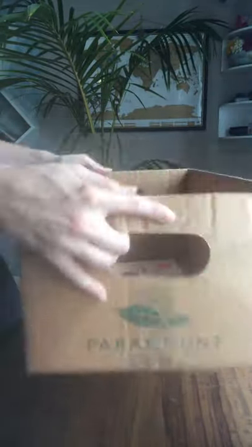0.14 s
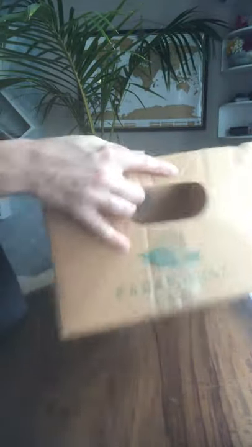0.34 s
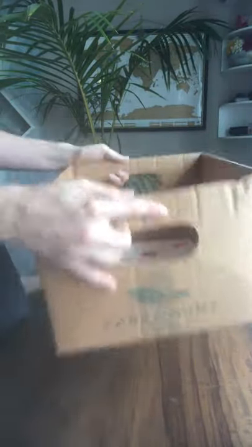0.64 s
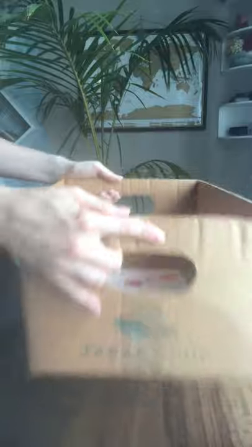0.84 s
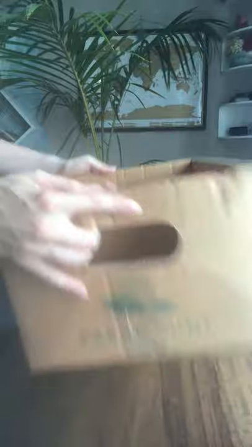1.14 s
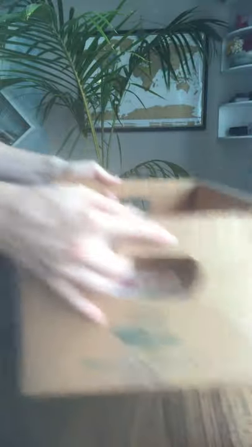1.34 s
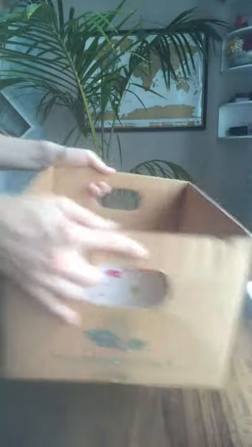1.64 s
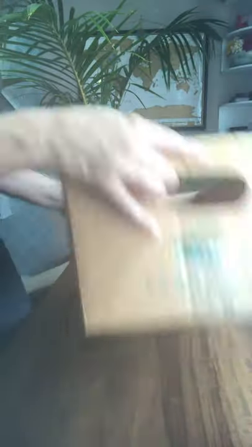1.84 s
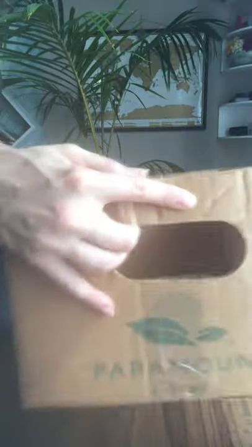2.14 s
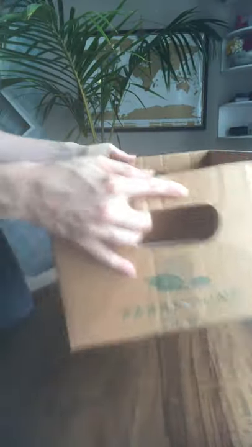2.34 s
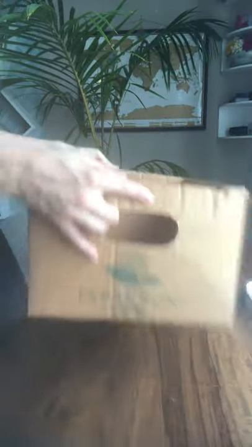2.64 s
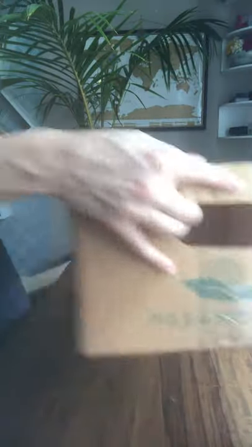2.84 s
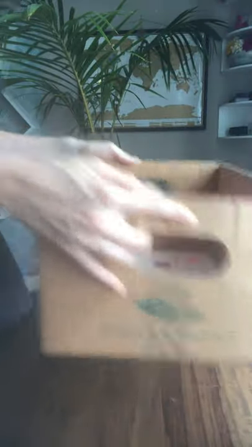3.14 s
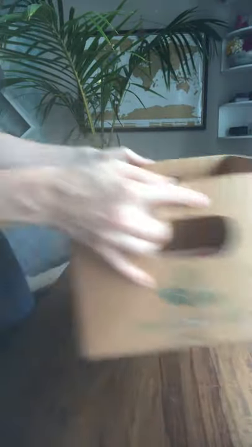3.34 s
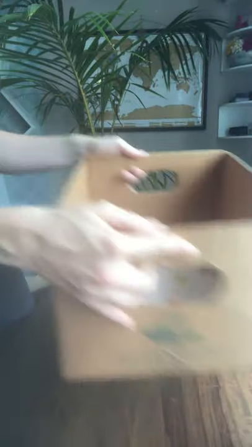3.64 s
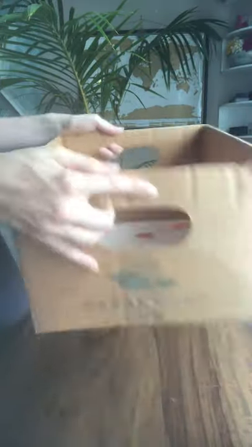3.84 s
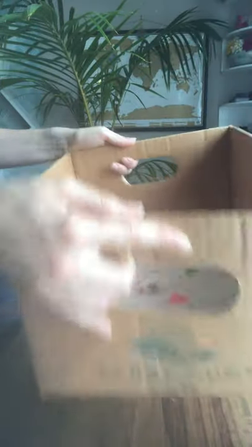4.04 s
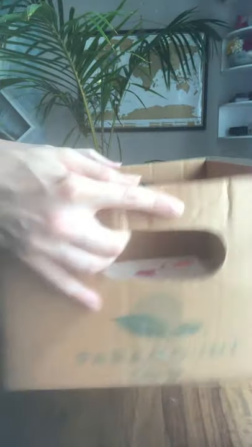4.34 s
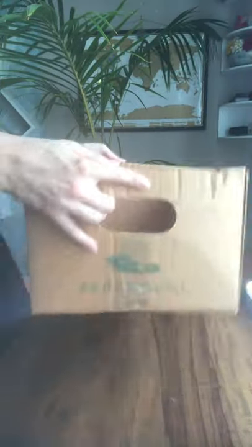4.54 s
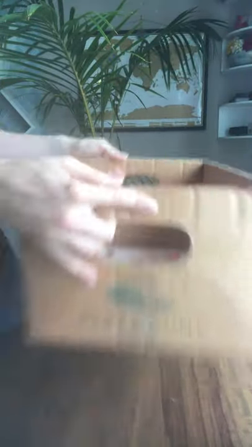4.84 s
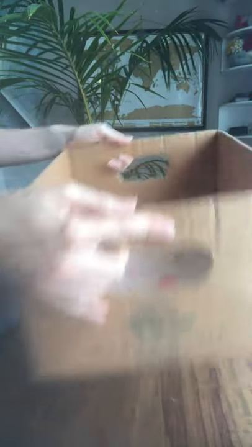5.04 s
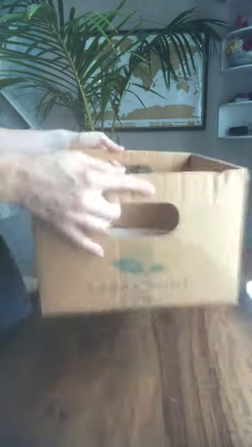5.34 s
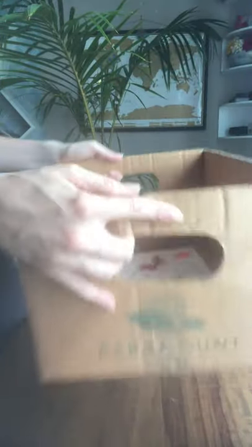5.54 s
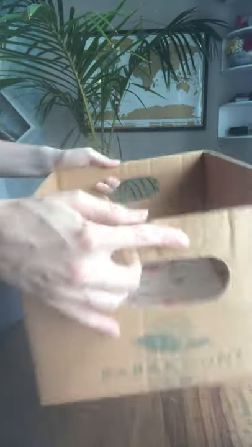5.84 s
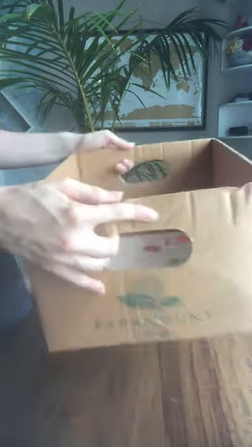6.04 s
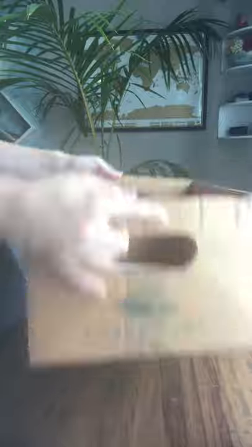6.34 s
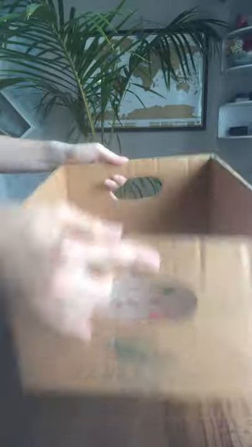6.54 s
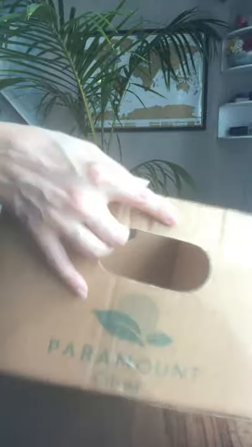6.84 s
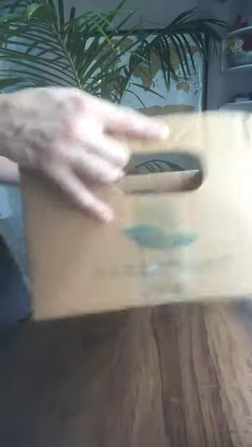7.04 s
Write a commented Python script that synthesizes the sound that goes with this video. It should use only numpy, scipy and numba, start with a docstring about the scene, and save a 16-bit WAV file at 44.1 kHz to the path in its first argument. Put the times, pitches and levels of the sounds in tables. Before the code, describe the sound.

Marbles clatter continuously inside a hand-shaken cardboard box, heard close up indoors. Woody, papery thumps and drier clacks vary in strength, from faint taps to sharp loud knocks, with grainy rolling and hiss between them. A soft hand thud hides in the rattle around five seconds; the strongest knocks follow shortly after, then a bright glass click and weaker rattling to the end. Short room reflections and low background hum.

```python
"""Dull knocks and rattles: glass marbles roll about in an open cardboard box that is tilted and shaken close by.
Each knock rings the panels of the box as damped sines and cracks as short noise; light rebounds follow.
Between knocks the marbles rumble and swish over the corrugated floor, as many tiny blows and flickering noise.
A glass click, stray ticks and a hand's soft thud join in. A living room adds a short noise tail, low hum and hiss."""
import sys
import numpy as np
from scipy import signal
from scipy.fft import rfft, irfft, next_fast_len
from scipy.io import wavfile
from scipy.ndimage import uniform_filter1d
from numba import njit

SR = 44100
rng = np.random.default_rng(int(sys.argv[2]) if len(sys.argv) > 2 else 0)


def output_pcm(signal):
    """Save a mono or channel-first signal as 16-bit PCM at the path in sys.argv[1].

    Samples are clipped to [-1, 1] before scaling.
    """
    pcm = np.clip(np.atleast_2d(signal).T, -1, 1) * 32767
    wavfile.write(sys.argv[1], SR, np.round(pcm).astype(np.int16))


N = 316669
ROUGH_DB = 3.5  # spread of the random roughness of level; a burst gets half of it

# Knocks on the walls, with a glass click of marble on marble at 6.17 s:
# start_s [s], strength_db [dB]; then levels over the strength: boom_db (large panels),
# knock_db (side walls), crack_db, tick_db [dB]; then the pitches favoured in the large panels, side walls
# and small patches: boom_hz, knock_hz, clack_hz [Hz]
HITS = [(0.0392, -15.5, -3, -5, -17, -29, 397, 810, 1485),
        (0.1248, -12, -10, -6.5, -14.5, -29, 438, 520, 1560),
        (0.2074, -27, -5, -5, -14, -20, 254, 945, 1570), (0.2362, -28, -6, -1.5, -12, -14, 440, 577, 1150),
        (0.2746, -33.5, 6.5, 7.5, -6.5, -17, 255.4, 504, 1050),
        (0.2945, -36.5, -8, -1, -2, -4, 425, 527, 2020), (0.354, -32.5, 0, 2, -18, -14, 232, 637, 1120),
        (0.378, -12.5, -14, -10.5, -12.5, -31, 245, 860, 1620),
        (0.4186, -31, -7, 0, -2, -8, 410, 746, 2240), (0.4573, -8, -7, -10.5, -27, -29, 320, 726, 1133),
        (0.526, -10, -23, -10, -23.5, -39, 248, 1027, 1186),
        (0.5667, -14.5, -12, -12, -13, -26, 268, 1080, 1550),
        (0.5921, -20, -13, -12, -21, -23, 278, 510, 1320),
        (0.635, -7.5, -8.5, -2.5, -17, -18.5, 262, 980, 1030),
        (0.7281, -13.5, -12, -8, -8, -15.5, 253, 778, 2380),
        (0.7959, -3, -10.5, -2.5, -33, -29, 320, 706, 1590),
        (0.8672, -14, -7, -7.5, -11.5, -21, 240, 1070, 1140),
        (0.8851, -7.5, -19.5, -9.5, -14.5, -33, 269, 920, 1060),
        (0.9615, -8.5, -9.5, -12.5, -17, -14.5, 252.5, 573, 2340),
        (1.0334, -15.5, -14.5, -9.5, -6.5, -14, 254, 746, 2520),
        (1.1601, -21, -11, -5.5, -18, -26, 260, 950, 1110), (1.2, -31.5, -10, -6, -4, -8, 244, 1010, 2120),
        (1.3537, -27.5, -6, -4, -12, -17, 232, 720, 1160), (1.3747, -20, 1, 9.5, -19, -22, 249, 712, 1150),
        (1.3846, -16, -10, -3, -22, -30, 350, 730, 2200),
        (1.4139, -24.5, -6, -11, -31, -28, 248, 557, 1160), (1.4591, -38, 1, -2, -17, -17, 374, 573, 1390),
        (1.492, -30, -2, -17, -18, -22, 382, 505, 1300), (1.6441, -25.5, -8, -5, -13, -27, 425, 580, 1130),
        (1.6977, -25.5, -15, -14, -19, -21, 270, 930, 1130),
        (1.729, -17.5, -4.5, -11, -22, -24, 283, 970, 1510),
        (1.7377, -19, 3.5, -2.5, -20.5, -24, 273, 838, 1110),
        (1.91, -18.5, 2.5, -7.5, -13.5, -14.5, 362, 966, 1930),
        (2.0151, -27.5, -17, -18, -11, -17, 394, 550, 1320),
        (2.0401, -16.5, -21, -8.5, -10, -26, 228, 530, 2000),
        (2.0542, -7.5, -7.5, -5, -22, -28, 385, 840, 1270), (2.1035, -18, -7, -3, -16, -15, 258, 485, 1230),
        (2.159, -4, -15.5, -6, -17.5, -21.5, 340, 720, 1640),
        (2.2383, -11, -13, -6, -17, -23, 269, 902, 1330),
        (2.3104, -23, 2, -0.5, -11.5, -16, 412, 514, 1170),
        (2.3582, -14, -2, 1, -15.5, -18.5, 390, 811, 1190),
        (2.4234, -17, -14, -5.5, -15.5, -30, 274, 700, 1146),
        (2.5157, -32, -9, -18, -13, -16, 242, 514, 1480),
        (2.5894, -14.5, -21, -11, -16, -25, 270, 1050, 1510),
        (2.5985, -18, -0.5, -9.5, -33, -23, 253, 531, 1150),
        (2.6438, -30.5, -12, -9, -4.5, -10, 393, 522, 1070),
        (2.7686, -13, -8.5, -13, -20, -35, 377, 900, 1470),
        (2.7872, -6.5, -10.5, -4.5, -19, -39, 270, 790, 1190),
        (2.8954, -11.5, -22.5, -2.5, -25, -33, 416, 630, 1100),
        (2.9796, -35.5, -8, -8, 0, -7, 392, 826, 1140),
        (3.0722, -12.5, -2.5, -13, -16, -11, 320, 800, 1150),
        (3.0811, -10.5, -12.5, -12, -18, -24, 410, 940, 1640),
        (3.2082, -20, 5.5, 0, -18, -23, 361, 819, 1130),
        (3.3428, -18.5, -15, -22, -12.5, -32, 277, 1000, 1750),
        (3.3573, -7, -20.5, -13.5, -14.5, -36, 270, 1120, 1600),
        (3.4484, -15, -2.5, -1.5, -18, -38, 248, 550, 1110),
        (3.5408, -39.5, -5, -6, -7, -16, 380, 689, 1350), (3.6403, -16, -15, -17, -12, -27, 265, 665, 1740),
        (3.647, -5, -16, -12, -18, -34, 277, 1110, 1570),
        (3.7559, -17.5, -11, -12, -21, -27, 382, 480, 1130),
        (3.8548, -13, -5, -2.5, -10, -28, 252.7, 855, 1620), (3.8816, -23, -5, 4, -26, -28, 261, 854, 1630),
        (3.9381, -25.5, -14, -11, -15, -19, 393, 1110, 1150),
        (3.9601, -21, -17, -16, -31, -36, 218, 744, 1110),
        (4.0003, -31.5, -18, -9, -11, -17, 248, 659, 1380),
        (4.0433, -33, -10, -11, -7, -12, 261, 490, 1130), (4.0766, -44, -17, -25, 1, -4, 398, 626, 1090),
        (4.137, -8.5, -18.5, -19, -18, -31, 275, 1020, 1390),
        (4.1466, -13, -5, -2, -18, -32, 271, 740, 1760), (4.1804, -32, -6, 2, -4, -11, 282, 535, 1680),
        (4.2445, -7.5, -15, -5, -15.5, -26, 416, 774, 1200),
        (4.3024, -22.5, -1, -4, -25, -17, 350, 814, 1130),
        (4.3142, -10, -10.5, -9, -13.5, -21.5, 271, 738, 1940),
        (4.471, -15.5, -24, -20, -30, -26, 307, 770, 1340),
        (4.4889, -12, -14.5, -16, -17, -37, 276, 1140, 1110),
        (4.5172, -33, -8, -8, 0.5, -13, 425, 530, 1620), (4.5929, -28.5, 7, -2.5, -19, -26, 269, 776, 1530),
        (4.6304, -26, -6, -8, -28, -31, 258, 840, 1480),
        (4.6506, -8.5, -15, -10.5, -16, -43, 258, 805, 1140),
        (4.691, -29, -12, -19, -4, -16, 448, 940, 1120),
        (4.8317, -10, -22, -24, -14.5, -27, 300, 1070, 2260),
        (4.8436, -19, -9, -6, -35, -38, 217, 892, 1910), (4.9089, -35, -4, -14, 1, -5, 256, 525, 2410),
        (5.0343, -15.5, -13, -9, -8.5, -23, 244, 710, 1550),
        (5.0856, -16.5, -4.5, 7, -15.5, -24, 237, 730, 1050),
        (5.1644, -27.5, 6, -1.5, -12, -17, 252, 508, 1580),
        (5.2108, -1.5, -15.5, -16, -16.5, -20.5, 225, 930, 1501),
        (5.2754, -8, -1.5, -5.5, -10.5, -14, 270, 821, 1160),
        (5.3606, -19.5, -3.5, -12, -18, -22, 253, 555, 1050),
        (5.4125, -21.5, -13, -19, -20, -25, 388, 690, 1505),
        (5.4424, -27, -1, -1, -21, -25, 290, 710, 1120), (5.4527, -5, -8.5, -1, -21.5, -27, 317, 730, 2010),
        (5.6202, -16.5, -17, -13, -22, -26, 221, 999, 1840),
        (5.6322, 0.5, -16, -12.5, -19.5, -26, 271, 554, 1360),
        (5.8012, -8.5, -15, -7, -18.5, -32, 253, 680, 1176),
        (5.8375, -5, -7.5, -0.5, -14.5, -25, 332, 723, 1940),
        (5.9742, -7, -18.5, -16, -21, -21, 268, 810, 1980),
        (6.0257, -7.5, -5, -3.5, -15.5, -25, 377, 816, 2010),
        (6.1694, -31.5, -14, -13, -16, 14, 240, 530, 2640),
        (6.2489, -25, 1.5, 10, -13, -18, 239, 643, 1410),
        (6.287, -37.5, -11, -12, -0.5, -11, 221, 624, 1130),
        (6.3167, -34.5, -9, -15, -9, -10, 242, 550, 1130),
        (6.3485, -24, 2.5, -7, -9.5, -18, 274, 487, 1130), (6.4582, -28, -21, -18, -8, -18, 285, 530, 2540),
        (6.5903, -13.5, -13, -15.5, -9, -26, 262, 930, 1740),
        (6.6653, -27.5, -12.5, -15, -8.5, -13, 405, 547, 2100),
        (6.786, -30, -8, -5, -14, -16, 273, 1080, 1290),
        (6.7937, -18.5, -15, -6.5, -15.5, -19, 370, 717, 1880),
        (6.8504, -30, -11, -17, -12, -21, 412, 743, 2000),
        (6.9348, -32.5, -5, -10.5, -7.5, -8, 428, 482, 1140),
        (6.9776, -32.5, -13, -18, -11, -16, 256, 504, 1140),
        (7.012, -30.5, -17, -14, 1, -7, 404, 1100, 1120), (7.107, -21, -17, -26, -14, -32, 266, 1100, 1904),
        (7.118, -22, -17, -16, -14, -16, 288, 680, 2140)]


def knocks():
    """Knocks on the walls and one glass click; each has three rebounds that hardly move the large panels."""
    span_s, first_loss_db, fade_db, scatter_db = 0.035, -11.5, -30, 29.0
    s, db, boom_db, knock_db, crack_db, tick_db, boom_hz, knock_hz, clack_hz = np.transpose(HITS)
    chance = rng.random((len(s), 3, 3))
    hits = np.array([s, db, db + boom_db, db + knock_db, db + crack_db, db + tick_db,
                     boom_hz, knock_hz, clack_hz])
    # from here on each knock stands three times, once for each rebound
    s, clack_db, boom_db, knock_db, crack_db, tick_db, boom_hz, knock_hz, clack_hz = np.repeat(hits, 3, axis=1)
    late, luck, bend = chance.reshape(-1, 3).T
    # later rebounds are weaker on average
    loss_db = first_loss_db + fade_db * late + scatter_db * (luck - 0.5)
    rebounds = [s + 0.0044 + span_s * late,
                clack_db + loss_db, boom_db + loss_db - 8.0, knock_db + loss_db - 1.0,
                crack_db + loss_db, tick_db + loss_db - 35.0,
                boom_hz, knock_hz, clack_hz * 2 ** (bend - 0.5)]
    return blows(*np.hstack([hits, rebounds]))


def blows(at, clack_db, boom_db, knock_db, crack_db, tick_db, boom_hz, knock_hz, clack_hz):
    """A marble's hit rings small patches, side walls and large panels, and adds noise; large panels answer last."""
    # Ringing modes of the large panels: pitch_hz [Hz], relative level_db [dB], t60_s (time to fade 60 dB) [s]
    boom_modes = [(126, -4, 0.14), (238.7, -7, 0.082), (269.8, -0.5, 0.079), (335, -2.5, 0.036),
                  (397.5, 2, 0.053)]
    # Ringing modes of the side walls: pitch_hz [Hz], relative level_db [dB], t60_s [s]
    knock_modes = [(528.5, -5, 0.12), (629, -3.5, 0.013), (729.6, 1.5, 0.035), (826, -1.5, 0.05),
                   (892, -1.5, 0.045)]
    # Ringing modes of small patches of board: pitch_hz [Hz], relative level_db [dB], t60_s [s]
    clack_modes = [(1136, 0, .035), (1362, -2, .028), (1630, -1, .028), (1776, -2, .025), (2070, -1, .022),
                   (2300, -3, .02), (2487, -3, .02), (2900, -6, .018), (3350, -6, .018)]
    boom = board(at + 0.0011, boom_db + 6.5, boom_hz, boom_modes,
                 focus_db=9.7, place_db=1.2, detune=0.051, spread_s=0.00094)
    knock = board(at + 0.00039, knock_db + 6.0, knock_hz, knock_modes,
                  focus_db=40.7, place_db=0.23, detune=0.049, spread_s=0.00051)
    # random roughness of level makes the clacks less tonal and noisier
    roughness = ragged(ROUGH_DB)
    clack = roughness * board(at, clack_db - 2.0, clack_hz, clack_modes,
                              focus_db=6.3, place_db=5.1, detune=0.045, spread_s=0.0008)
    # the board gives under the marble, so the panels are pushed with a softened click
    soft_hz = 1580
    panels = signal.sosfilt(signal.butter(2, soft_hz, fs=SR, output="sos"), boom + knock)
    ringing = panels + band(clack, 760, 4850)
    crack = burst(at, crack_db, lo_hz=1756, hi_hz=4848, t60=0.0564, level_db=-2.77)
    tick = burst(at, tick_db, lo_hz=2900, hi_hz=11900, t60=0.019, level_db=0.11)
    return ringing + crack + tick


def board(at, db, pitch_hz, modes, focus_db, place_db, detune, spread_s):
    """Blows ring a family of modes; the place of the blow favours those near one pitch, the grip detunes them."""
    hz, mode_db, t60 = np.transpose(modes)
    place = rng.standard_normal((len(at), 4, len(modes)))
    octaves = np.log2(hz / pitch_hz[:, None])
    # modes far from the favoured pitch lose level, by 14 dB at most
    far_db = np.minimum(focus_db * abs(octaves), 14.0)
    share = undb(mode_db - far_db + place_db * place[:, 0])
    share = share / np.sqrt(np.sum(share ** 2, axis=1, keepdims=True))
    # the nearest mode is bent onto the favoured pitch; the others stray at random
    nearest = abs(octaves) == abs(octaves).min(axis=1, keepdims=True)
    tuned = np.where(nearest, pitch_hz[:, None], hz * (1 + detune * place[:, 1]))
    start = ((at[:, None] + spread_s * abs(place[:, 2])) * SR).astype(np.int64)
    gain = undb(db)[:, None] * share * np.sign(place[:, 3])
    return rings(N, start.ravel(), tuned.ravel(), np.tile(t60, len(at)), gain.ravel(), float(SR))


@njit
def rings(length, start, hz, t60, gain, rate):
    """Damped sines, each from its own moment until it has faded by 45 dB."""
    out = np.zeros(length)
    for k in range(len(start)):
        # one step of turning and fading per sample
        step = np.exp(2j * np.pi * hz[k] / rate - np.log(1000) / (t60[k] * rate))
        swing = gain[k] + 0j
        for i in range(start[k], min(length, start[k] + int(0.75 * t60[k] * rate))):
            out[i] += swing.imag
            swing *= step
    return out


def burst(at, db, lo_hz, hi_hz, t60, level_db):
    """Blows too dense in modes to have a pitch: a snap and a fast fading, ragged noise."""
    snap_share, snap_db = 0.4, -6  # the snap's part of the fade time; its level over the fade
    push = clicks(at, undb(db + level_db))
    fade = fading(push, t60)
    snap = fading(push, snap_share * t60)
    envelope = (fade + undb(snap_db) * snap) * ragged(ROUGH_DB / 2)
    return envelope * unit(band(rng.standard_normal(N), lo_hz, hi_hz))


def ragged(db):
    """Random roughness of level: a gain that jumps every 50 samples, about a millisecond."""
    return undb(db * np.repeat(rng.standard_normal(N // 50 + 1), 50)[:N])


def rolling():
    """Marbles hop over the flutes of the board in many tiny blows and rub with a flickering hiss."""
    # Colour of the rubbing hiss: pitch_hz [Hz], relative level_db [dB]
    rub_colour = [(1200, 3.5), (2500, -3.5), (4200, -5), (5200, -5), (7500, -5), (10300, -20), (12000, -9),
                  (15500, -13)]
    s, rumble_db, hiss_db = motion()
    chance = rng.random((900, 5))  # 900 hops
    at = chance[:, 0] * N / SR
    # most hops are small and a few are large
    size_db = -2.5 * np.log(1 - chance[:, 1])
    low_db = np.interp(at, s, rumble_db) + size_db - 7.0
    high_db = np.interp(at, s, hiss_db) + size_db
    # each favoured pitch lies up to an octave above these
    pitch_hz = np.array([230, 500, 1050]) * 2 ** chance[:, 2:]
    hops = blows(at, low_db + 3.5, low_db - 11.0, low_db + 1.7, high_db - 2.0, high_db - 31.0, *pitch_hz.T)
    # the hiss wavers by about 3 dB in steps of some 7 ms
    steps = np.repeat(rng.standard_normal(N // 300 + 1), 300)[:N]
    flicker = unit(uniform_filter1d(steps, size=200))
    rub = unit(colour(rng.standard_normal(N), [(20, -60)] + rub_colour))
    rub_db = np.interp(np.arange(N) / SR, s, hiss_db) + 3.0 * flicker + 2.5
    return hops + rub * undb(rub_db)


def motion():
    """Levels of rumble and hiss in dB over time: at rest, in each shake, and rolling off after each knock."""
    # Shakes that sweep the marbles over the floor: peak_s [s], guide hiss level_db before trims [dB]
    shakes = [(.12, -52), (.25, -50), (.41, -48.5), (.57, -48), (.76, -48), (.89, -47.5), (1.05, -47),
              (1.19, -48.5), (1.37, -50.5), (1.58, -60), (1.73, -51.5), (1.93, -57.5), (2.06, -54),
              (2.18, -50), (2.27, -49), (2.44, -47.5), (2.61, -48.5), (2.79, -46.5), (2.89, -53),
              (2.98, -52), (3.09, -48.5), (3.22, -54), (3.36, -53.5), (3.5, -56.5), (3.66, -56.5),
              (3.88, -54), (4.02, -52), (4.16, -47), (4.33, -46), (4.5, -46.5), (4.671, -44), (4.86, -44.5),
              (5.06, -47.5), (5.18, -51.5), (5.27, -54), (5.47, -47.5), (5.64, -45.5), (5.83, -47),
              (6.01, -49), (6.19, -52.5), (6.31, -58), (6.48, -49), (6.61, -49), (6.8, -50.5),
              (6.95, -51.5), (7.13, -51.5)]
    swell_s, settle_s = 0.04, 0.054  # a swish grows and dies as half a bell curve of these widths
    rest_rumble_db, rest_hiss_db = -60.5, -65  # guide levels between shakes
    shake_rumble_db = 7  # a shake's rumble over its hiss
    roll_off_db, roll_off_slope = -25, 0.8  # rolling off: level, and dB per dB of the knock
    rise_s, roll_off_t60_s = 0.09, 0.67
    t = np.arange(0, N / SR, 0.002)
    peak_s, peak_db = np.transpose(shakes)
    since = t[:, None] - peak_s
    width_s = np.where(since < 0, swell_s, settle_s)
    swish = undb(peak_db) * np.exp(-0.5 * (since / width_s) ** 2)
    swish_power = np.sum(swish ** 2, axis=1)
    # a knock sends the marbles rumbling off
    s, db, boom_db, knock_db = np.transpose(HITS)[:4]
    age = np.maximum(t[:, None] - s, 0)
    spurts = undb(roll_off_db + roll_off_slope * (db + np.maximum(boom_db, knock_db)))
    spurts = spurts * (1 - np.exp(-age / rise_s)) * np.exp(-np.log(1000) * age / roll_off_t60_s)
    # powers add up; doubling the dB squares the gain
    rumble_power = undb(2 * rest_rumble_db) + undb(2 * shake_rumble_db) * swish_power
    rumble_power = rumble_power + np.sum(spurts ** 2, axis=1)
    hiss_power = undb(2 * rest_hiss_db) + swish_power
    return t, 10 * np.log10(rumble_power), 10 * np.log10(hiss_power)


def strays():
    """Light ticks of marbles touching each other at random moments, as short noise bursts."""
    chance = rng.random((170, 2))  # 170 ticks
    size_db = -47.5 - 2.0 * np.log(1 - chance[:, 1])
    return burst(chance[:, 0] * N / SR, size_db, lo_hz=1200, hi_hz=6000, t60=0.0235, level_db=-0.5)


def bump():
    """A hand shifts its grip with a soft thud: one low, damped swing that starts softly."""
    start_s, pitch_hz, t60_s, level_db = 5.012, 86.5, 0.042, -18
    t = np.maximum(np.arange(N) / SR - start_s, 0)
    swing = undb(level_db) * np.sin(2 * np.pi * pitch_hz * t)
    return swing * 1000 ** (-t / t60_s) * (1 - np.exp(-t / 0.0011))


def room(x):
    """Dense reflections as fading noise, each octave at its own rate; they change as the box moves."""
    # Fading of the room: pitch_hz [Hz], t60_s (time to fade 60 dB) [s], relative level_db [dB]
    room_fade = [(100, 0.5, -2.5), (296, 0.31, 7.5), (1000, 0.31, 0), (3000, 0.45, -4), (8150, 0.25, -4.5),
                 (15300, 0.24, 6.5)]
    places, place_s = 5, 0.13  # places of the box, visited in turn; time from one to the next
    level_db, rise_s = -13.5, 0.001
    fade_hz, fade_t60_s, fade_db = np.transpose(room_fade)
    t = np.arange(int(0.4 * SR)) / SR
    tails = 0
    for hz in 70 * 2 ** np.arange(8):
        middle = np.log(1.4 * hz)
        t60 = np.interp(middle, np.log(fade_hz), fade_t60_s)
        db = np.interp(middle, np.log(fade_hz), fade_db)
        octave = band(rng.standard_normal((places, len(t))), hz, min(2 * hz, 17000))
        tails = tails + undb(db) * octave * 1000 ** (-t / t60)
    tails = tails * np.clip(t / rise_s, 0, 1) ** 2
    # neighbouring places cross-fade at constant power
    place = np.arange(N) / SR / place_s
    echo = 0
    for k in range(places):
        near = np.clip(1 - abs((place - k + 1) % places - 1), 0, 1) ** 0.5
        tail = tails[k] / np.sqrt(np.sum(tails[k] ** 2))
        echo = echo + signal.oaconvolve(x * near, tail)[:N]
    return undb(level_db) * echo


def background():
    """Soft room noise, and a low hum of narrow noise that swells and sinks."""
    # Colour of the room noise: pitch_hz [Hz], relative level_db [dB per Hz]
    air_colour = [(15, -40), (30, -1), (70, -12), (120, 7.5), (160, -10), (240, 2.5), (400, -5.5),
                  (1200, -25), (4000, -40), (10300, -37), (16000, -42)]
    # Swelling of the hum: time_s [s], level_db [dB]
    hum_swell = [(0, -42), (.6, -50), (1.2, -52), (3, -54), (4.6, -53), (5.6, -48), (6.4, -49.5),
                 (7.18, -48.5)]
    hum_hz, width_hz, air_db = 69.7, 13, -48.5
    hum = band(rng.standard_normal(N), hum_hz - width_hz / 2, hum_hz + width_hz / 2)
    hum_db = np.interp(np.arange(N) / SR, *np.transpose(hum_swell))
    air = unit(colour(rng.standard_normal(N), air_colour))
    return undb(air_db) * air + undb(hum_db) * unit(hum)


def undb(db):
    """Gain of a level in dB."""
    return 10 ** (np.asarray(db) / 20)


def unit(x):
    """Scale to an average strength (rms) of 1."""
    return x / np.sqrt(np.mean(x ** 2))


def colour(x, points):
    """Shape by a spectrum of (Hz, dB) points."""
    hz, db = np.transpose(points)
    size = next_fast_len(len(x))
    bins = np.maximum(np.arange(size // 2 + 1) * SR / size, 1)
    gain = undb(np.interp(np.log(bins), np.log(hz), db))
    return irfft(rfft(x, size) * gain, size)[:len(x)]


def band(x, lo_hz, hi_hz):
    """Keep the sound between two pitches (band-pass)."""
    return signal.sosfilt(signal.butter(2, [lo_hz, hi_hz], "bandpass", fs=SR, output="sos"), x)


def clicks(at, size):
    """Impulses of the given sizes at the given seconds."""
    return np.bincount(np.clip((at * SR).astype(int), 0, N - 1), size, N)


def fading(push, t60):
    """Each impulse dies away smoothly, by 60 dB in t60 seconds."""
    return signal.lfilter([1], [1, -np.exp(-np.log(1000) / (t60 * SR))], push)


def scene():
    """The box, its room, a hand and the background."""
    # low down the small box pushes air around its edges and makes little sound
    radiate_hz = 155.5
    radiate = signal.butter(3, radiate_hz, "highpass", fs=SR, output="sos")
    box = signal.sosfilt(radiate, knocks() + rolling() + strays())
    return (box + room(box) + bump() + background())[None]


def record(dry):
    """Peaks beyond 0.98 of full scale are clipped, then the top is cut steeply."""
    top_hz = 15800
    clipped = np.clip(dry, -0.98, 0.98)
    return signal.sosfilt(signal.ellip(10, 0.2, 90, top_hz, fs=SR, output="sos"), clipped)


dry = scene()
out = record(dry)
output_pcm(out)
```